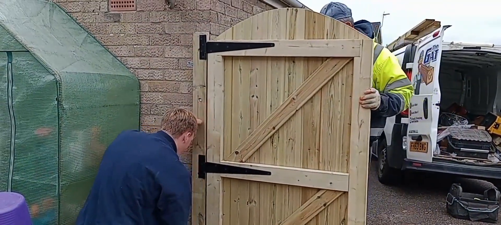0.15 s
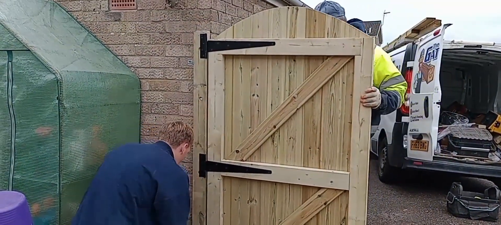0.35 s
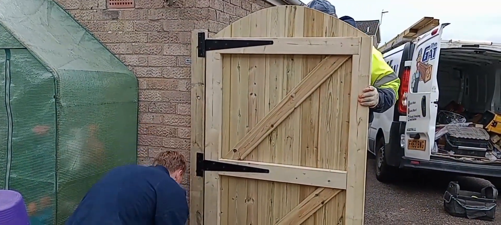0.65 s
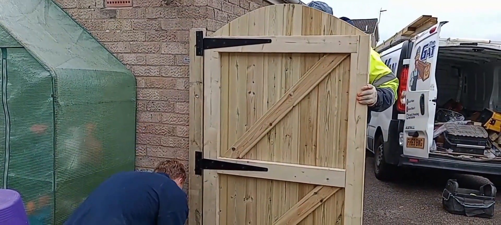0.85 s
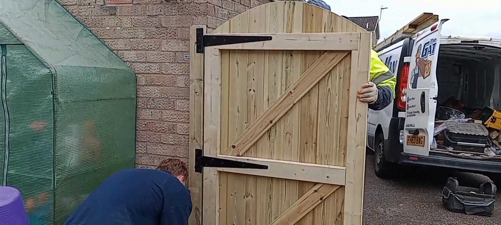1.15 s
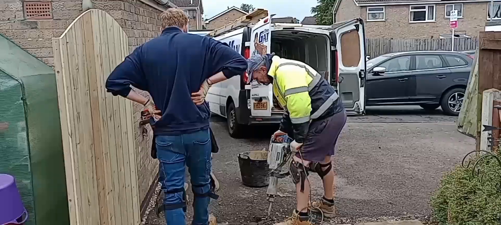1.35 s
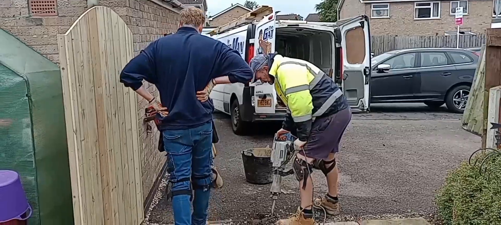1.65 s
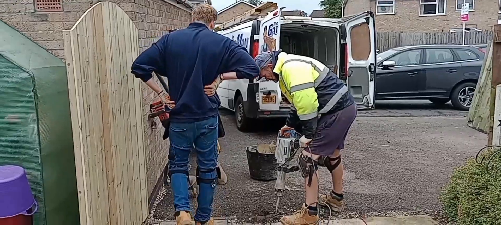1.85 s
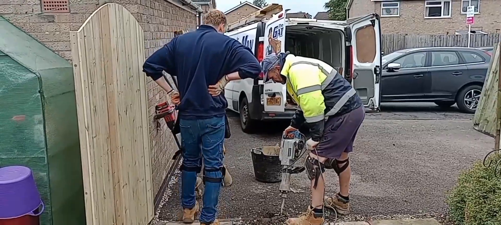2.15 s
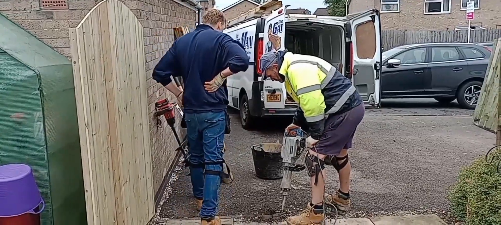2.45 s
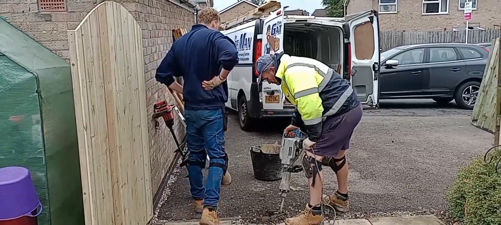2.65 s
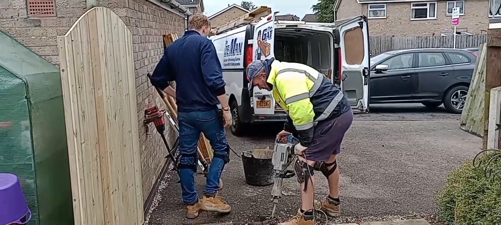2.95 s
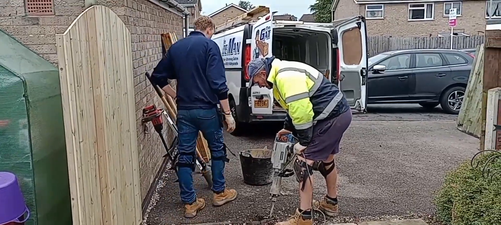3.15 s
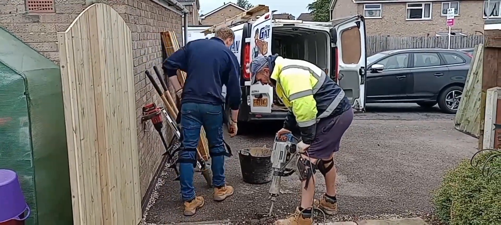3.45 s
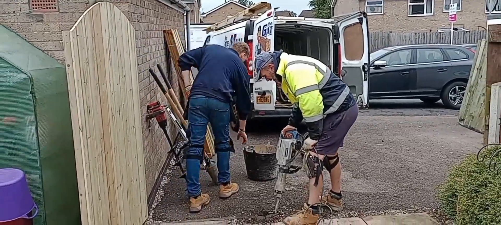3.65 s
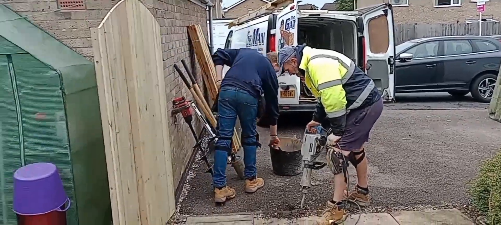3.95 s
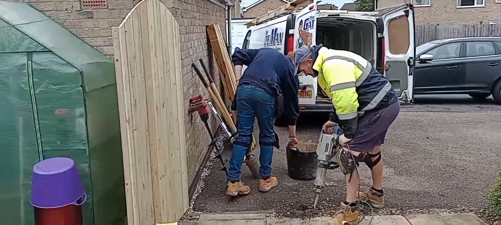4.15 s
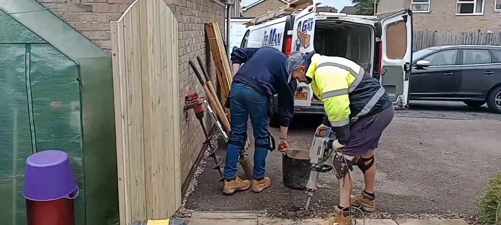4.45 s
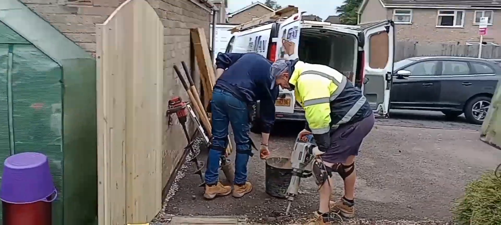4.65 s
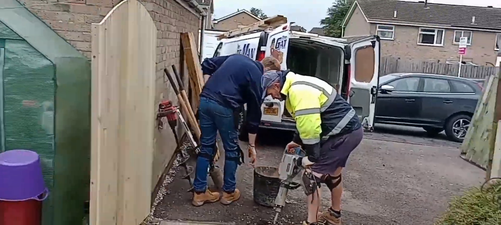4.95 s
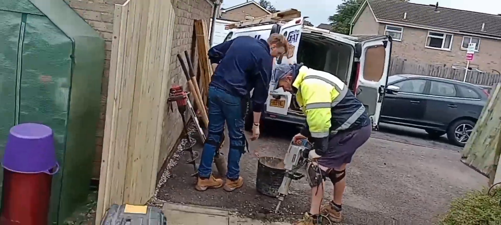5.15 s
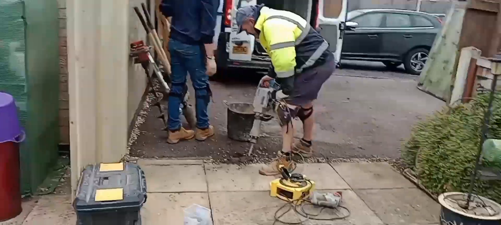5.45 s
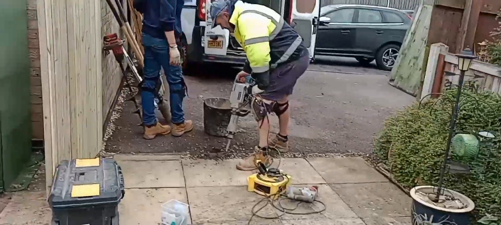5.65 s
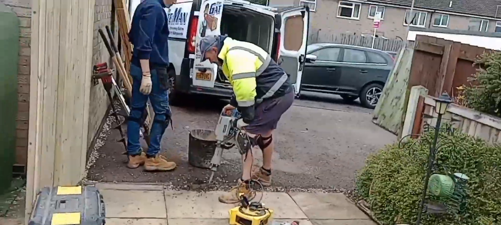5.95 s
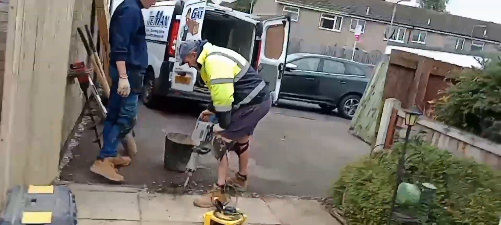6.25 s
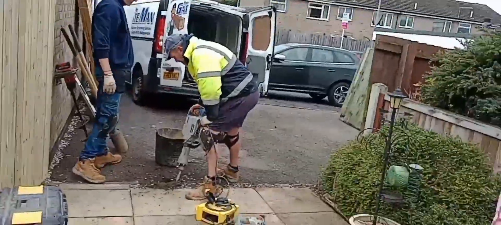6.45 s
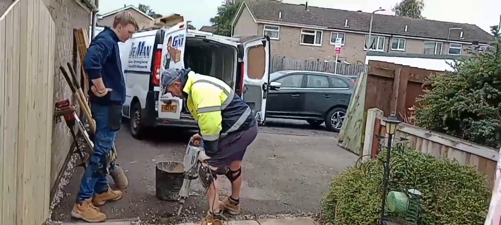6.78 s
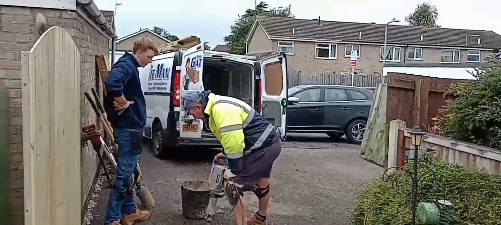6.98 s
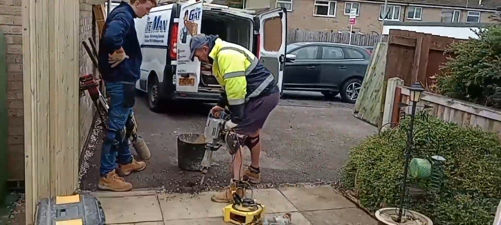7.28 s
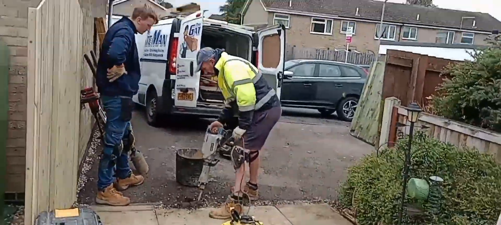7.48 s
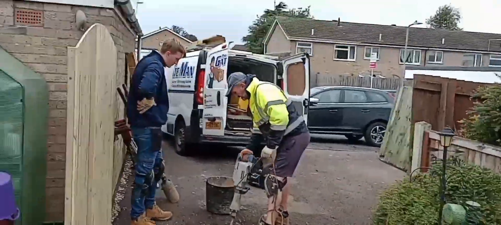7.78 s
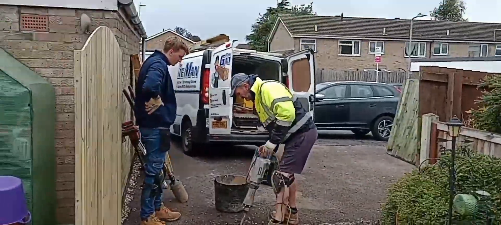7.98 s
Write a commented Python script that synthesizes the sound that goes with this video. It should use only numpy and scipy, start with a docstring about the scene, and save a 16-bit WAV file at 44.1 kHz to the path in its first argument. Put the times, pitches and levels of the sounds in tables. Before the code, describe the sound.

A wooden gate thuds against its post, then a breaker hammers stony ground at a rapid rate, ringing, scraping slab and finally rattling, amid wind buffets.

```python
"""A wooden gate knocks twice against its post: ticks, noise thuds and decaying frame modes, with wind pops.
After a short break an electric demolition hammer chisels gravelled ground, one noise burst per crank turn,
over gear clatter and air hiss. The wedged chisel zings, then rings as it bounces; a loose slab clanks.
Late on the chisel grinds along the slab, squeaks once and rattles in its holder.
Yard walls answer with a noise tail; wind buffets the microphone throughout."""
import sys
import numpy as np
from scipy import signal
from scipy.fft import rfft, irfft, next_fast_len
from scipy.io import wavfile
from scipy.ndimage import uniform_filter1d, map_coordinates

SR = 44100
rng = np.random.default_rng(int(sys.argv[2]) if len(sys.argv) > 2 else 0)


def wav_out(sig):
    """Save sig, one row per channel (or a flat mono array), as 16-bit PCM at SR to the path in sys.argv[1]."""
    wavfile.write(sys.argv[1], SR, np.round(np.clip(np.atleast_2d(sig).T, -1, 1) * 32767).astype(np.int16))


N = 358091
TIME = np.arange(N) / SR

# silent gap (start [s], end [s])
BREAK_S = (1.263, 1.302)


def amp(db):
    """Decibels to gain."""
    return 10 ** (np.asarray(db) / 20)


def unit(x):
    """Scale to rms 1."""
    return x / np.sqrt(np.mean(x ** 2) + 1e-20)


def along(points, hz):
    """Interpolate (frequency [Hz], value) points on a log frequency axis."""
    f, v = np.transpose(points)
    return np.interp(np.log(hz + 1), np.log(f + 1), v)


def curves(rows):
    """One value per sample for each column after the time."""
    s, *cols = np.transpose(rows)
    return [np.interp(TIME, s, c) for c in cols]


def wobble(knots_per_s):
    """Smooth random curve through normally distributed knots."""
    knots = rng.standard_normal(int(N * knots_per_s / SR) + 4)
    return map_coordinates(knots, [TIME * knots_per_s])


def filtered(x, response):
    """Multiply the spectrum of x by a response of frequency."""
    m = next_fast_len(N + SR // 2)
    return irfft(rfft(x, m) * response(np.fft.rfftfreq(m, 1 / SR)), m)[..., :N]


def coloured(x, spectrum):
    """Minimum-phase colouring that keeps the power of white noise."""
    size = 4096
    gain = unit(amp(along(spectrum, np.fft.rfftfreq(size, 1 / SR))))
    # folding the cepstrum onto positive time makes the filter causal
    cepstrum = irfft(np.log(gain + 1e-6))
    cepstrum[1:size // 2] *= 2
    cepstrum[size // 2 + 1:] = 0
    impulse = irfft(np.exp(rfft(cepstrum)))
    return signal.fftconvolve(x, impulse)[:N]


def noise(spectrum):
    """Coloured noise of rms 1."""
    return unit(coloured(rng.standard_normal(N), spectrum))


def add(track, s, sound):
    """Mix a sound into the track at s seconds."""
    part = track[round(s * SR):][:len(sound)]
    part += sound[:len(part)]


def ring(modes, t, scatter_db, detune):
    """Decaying modes, with new strengths and slightly new pitches at each call."""
    total = np.zeros(len(t))
    for hz, db, t60 in modes:
        decay = amp(db + rng.normal(0, scatter_db) - 60 * t / t60)
        cycles = hz * rng.normal(1, detune) * t + rng.random()
        total += decay * np.sin(2 * np.pi * cycles)
    return total


def struck(hits, modes, scatter_db, detune):
    """One ring of the modes for each (time [s], level [dB]) hit."""
    longest_s = max(t60 for _, _, t60 in modes)
    track, t = np.zeros(N), np.arange(int(SR * longest_s)) / SR
    attack = 1 - np.exp(-t / 0.00015)
    for s, db in hits:
        add(track, s, amp(db) * ring(modes, t, scatter_db, detune) * attack)
    return track


def morph(x, amount, change):
    """Blend, by amount 0-1, towards x filtered by (frequency [Hz], gain [dB]) points."""
    changed = filtered(x, lambda hz: amp(along(change, hz)))
    return x + amount * (changed - x)


# background noise colour (frequency [Hz], relative density [dB per Hz])
STREET_SPECTRUM = [(800, -8), (1840, -19), (15500, -36)]


def street():
    """Faint steady coloured noise."""
    return amp(-53.5) * noise(STREET_SPECTRUM)


# wind between buffets (time [s], level [dB])
WIND_LEVEL = [(0.45, -48.5), (0.9, -54), (1.7, -49.5), (2.15, -38), (2.9, -38.5), (3.25, -51), (5.05, -38),
              (6.0, -43), (6.46, -35.5), (7.85, -37.5)]
# rumble and thump colour (frequency [Hz], relative density [dB per Hz])
BUFFET_SPECTRUM = [(20, -64), (45, -25.5), (80, -1), (220, -5), (330, -16), (1500, -66)]
# flurries (time [s], thump [dB], flutter [dB], half length to -17 dB [s])
BUFFETS = [(1.06, -34, -52, 0.054), (2.288, -31.5, -29, 0.069), (4.454, -26, -24, 0.03),
           (4.88, -36.5, -39, 0.12), (5.306, -31, -31.5, 0.11), (6.498, -35, -32.5, 0.13),
           (7.696, -32, -31.5, 0.068), (7.86, -32, -33, 0.051)]


def wind():
    """A low rumble with flurries, each a thump with some flutter above it."""
    rumble = amp(curves(WIND_LEVEL)[0] + 3.2 * wobble(25))
    _, thump_db, flutter_db, _ = np.transpose(BUFFETS)
    swells = np.array([np.exp(-2 * ((TIME - s) / length_s) ** 2) for s, _, _, length_s in BUFFETS])
    swells = swells * amp(2.8 * wobble(70))
    low = (rumble + amp(thump_db) @ swells) * noise(BUFFET_SPECTRUM)
    flutter = noise([(100, -33.0), (230, 6.5), (520, 4), (900, -10), (2500, -52)])
    return low + amp(flutter_db) @ swells * flutter


# single eddies on the microphone (time [s], envelope peak [dB], pitch [Hz])
POPS = [(.173, -20, 89.3), (.188, -20, 140.7), (.283, -24, 135), (.3255, -17.5, 180), (.413, -29.5, 160),
        (.737, -31, 105), (.801, -28, 148), (5.269, -16, 228), (6.504, -14.5, 308), (6.515, -16, 180),
        (6.553, -11.5, 280.5), (6.6, -11.5, 151.5), (7.531, -16, 190), (7.766, -13, 210.5),
        (7.857, -21, 169.5), (7.908, -16.5, 160.5)]
POP_HALF_CYCLES = 0.44  # half length to 1/e


def pops():
    """Each eddy gives the diaphragm one low push and pull, with two weaker ones nearby."""
    track = np.zeros(N)
    for first_s, first_db, hz in POPS:
        for k in range(3):
            s = first_s + k * rng.normal(0, 0.01355)
            swell = amp(first_db - 6 * k) * np.exp(-((TIME - s) * hz / POP_HALF_CYCLES) ** 2)
            track += swell * np.sin(2 * np.pi * (hz * TIME + rng.random()))
    return track


# decay of the yard (frequency [Hz], t60 [s])
YARD_T60 = [(200, 0.56), (2000, 0.03), (12000, 0.54)]


def yard(x):
    """Walls and paving scatter a diffuse tail, 5 ms late, with its own decay at each frequency."""
    hz, t, z = signal.stft(rng.standard_normal(SR // 3), SR, nperseg=256)
    decay = amp(-60 * t / along(YARD_T60, hz)[:, None])
    tail = signal.istft(z * decay, SR, nperseg=256)[1]
    delayed = np.pad(x, (round(.005 * SR), 0))
    return signal.fftconvolve(delayed, tail / np.linalg.norm(tail))[:N]


# gate meets post (time [s], level [dB], contact tick [dB])
KNOCKS = [(.101, -28, -30.5), (0.105, -19, -46), (.111, -22, -48), (0.153, -34, -43), (0.9896, -19, -28.5),
          (1.0, -22, -42), (1.03, -26.5, -54)]
# gate frame (frequency [Hz], relative level [dB], t60 [s])
GATE_MODES = [(132.6, -9.5, 0.3), (303, -9, 0.16), (415, -12, 0.16), (547, -5, 0.096), (670, -6.5, 0.1),
              (835, -15, 0.17), (1280, -14, 0.078), (1570, -30, 0.15)]


def gate():
    """Each contact ticks, thuds through the boards and rings the frame."""
    ticks, thuds, t = np.zeros(N), np.zeros(N), np.arange(SR // 3) / SR
    # a fast decay, then a weaker slow one
    tick_decay = amp(-60 * t / 0.032) + amp(-9.0 - 60 * t / 0.31)
    thud_decay = amp(-60 * t / 0.07) + amp(-19.5 - 60 * t / 0.37)
    for s, db, tick_db in KNOCKS:
        add(ticks, s, amp(tick_db) * tick_decay * rng.standard_normal(len(t)))
        add(thuds, s, amp(db) * thud_decay * rng.standard_normal(len(t)))
    frame = struck([row[:2] for row in KNOCKS], GATE_MODES, scatter_db=3, detune=0.012)
    boards = coloured(thuds, [(60, -9.5), (650, 0.0), (1000, -14), (1600, -19.0), (2500, -45)])
    contact = coloured(ticks, [(1500, 8.5), (2400, -3), (5300, -1.5), (6300, -3), (15000, -16)])
    knocks = frame + boards + contact
    return knocks + amp(-14) * yard(knocks)


# crank speed, slower under load (time [s], rate [blows per s])
CRANK_RATE = [(1.32, 30.68), (2.175, 28.0), (2.36, 30.1), (3.155, 25.12), (3.589, 25.59), (3.763, 21.69),
              (4.076, 27.13), (4.303, 21.04), (4.392, 27.77), (4.831, 22.35), (5.298, 27.26),
              (5.423, 23.24), (5.902, 22.63), (6.571, 26.47), (6.931, 22.39), (7.748, 23.56),
              (7.828, 28.59), (8.12, 24.71)]
START_TURN = -0.04


def crank():
    """Crank position [turns]: the integral of the rate, at rest before the first row."""
    running = TIME >= CRANK_RATE[0][0]
    return START_TURN + np.cumsum(curves(CRANK_RATE)[0] * running) / SR


def strokes(turns):
    """The moments [s] at which the crank completes a turn."""
    return TIME[1:][np.diff(np.floor(turns)) > 0]


def bouts(rows, turns, fade_db_per_s):
    """One (time [s], level [dB]) hit for every stroke between the start and end of each row."""
    times = strokes(turns)
    hits = []
    for start, end, db in rows:
        hits += [(s, db - fade_db_per_s * (s - start)) for s in times if start <= s < end]
    return hits


# looseness of the chisel in its hole: tighter, strokes more alike (time [s], looseness [1])
LOOSENESS = [(2.0, 0.48), (3.3, 2.3), (5.25, 1.46), (5.5, 0.79), (6.35, 0.58), (6.7, 1.6)]
# change of the stroke pattern (frequency [Hz], renewal per stroke at looseness 1 [1])
RENEWAL = [(500, .25), (3500, .6), (9000, 1.1)]


def patterns(times, size):
    """One noise burst per stroke, each a slightly changed copy of the last; the bass repeats best."""
    renewal = along(RENEWAL, np.fft.rfftfreq(size, 1 / SR))
    bursts = rfft(rng.standard_normal((len(times), size)))
    looseness = np.interp(times[1:], *np.transpose(LOOSENESS))
    for k, loose in enumerate(looseness, 1):
        kept = np.exp(-renewal * loose)
        # root of 1 - kept^2 holds the power constant
        bursts[k] = kept * bursts[k - 1] + np.sqrt(1 - kept ** 2) * bursts[k]
    return irfft(bursts, size)


# gear colour (frequency [Hz], relative density [dB per Hz])
GEAR_SPECTRUM = [(70, -34), (200, 1.5), (290, -6.5), (380, -5), (520, -7.5), (1100, -7), (1600, 2),
                 (2000, -1.5), (2900, 2), (3700, 2.5), (4600, 1), (5600, -1.5), (7000, -5), (10000, -13)]


def clatter(turns):
    """The gear train repeats part of its clatter on every crank turn; the rest is chance."""
    times, track = strokes(turns), np.zeros(N)
    lengths_s = np.diff(times, append=N / SR)
    for s, length_s, burst in zip(times, lengths_s, patterns(times, size=SR // 12)):
        add(track, s, burst[:round(length_s * SR)])
    return unit(coloured(track + 0.69 * rng.standard_normal(N), GEAR_SPECTRUM))


def patchy(x, depth_db):
    """Loose parts ring at their own pitches for a few hundredths of a second."""
    z = signal.stft(x, nperseg=512)[2]
    field = uniform_filter1d(rng.standard_normal(z.shape), size=4, axis=0)
    field = uniform_filter1d(field, size=6, axis=1)
    gain = unit(amp(depth_db * unit(field)))
    return signal.istft(z * gain, nperseg=512)[1][:N]


# motor (time [s], gear rattle [dB], air hiss [dB])
MOTOR_LEVELS = [(1.32, -37, -46), (1.5, -31, -37.5), (2.2, -27.5, -37), (2.7, -29, -40.5),
                (4.05, -29, -32.5), (4.4, -29.5, -36.5), (7.7, -29, -34), (7.92, -29, -48)]
# cooling air colour (frequency [Hz], relative density [dB per Hz])
AIR_SPECTRUM = [(2500, -30), (5000, -9), (7000, -1), (8300, 2), (9400, -3), (11700, -3), (12700, -1),
                (15600, -9)]


def motor(turns):
    """Gears rattle, hardest as the piston compresses before a blow; cooling air hisses."""
    gear_db, air_db = curves(MOTOR_LEVELS)
    load = np.cos(2 * np.pi * (turns + 0.23))
    gears = amp(gear_db + 1.9 * load + 0.84 * wobble(260)) * clatter(turns)
    air = amp(air_db + 3.9 * wobble(170)) * noise(AIR_SPECTRUM)
    return patchy(gears + air, depth_db=2)


# shank squeal (time [s], level [dB])
SQUEAL_LEVEL = [(1.4, -43), (2.7, -34.5), (6.5, -34), (6.8, -51), (7.72, -46), (7.82, -31), (7.92, -58)]
SQUEAL_HZ, SQUEAL_Q = 12480, 55


def squeal():
    """The shank sticks and slips in its holder and excites one high resonance in fitful chirps."""
    slips = amp(5 * wobble(60)) * rng.standard_normal(N)
    resonance = signal.iirpeak(SQUEAL_HZ, SQUEAL_Q, SR)
    return amp(curves(SQUEAL_LEVEL)[0]) * unit(signal.lfilter(*resonance, slips))


RATTLE_START_S, RATTLE_TICKS_PER_S, RATTLE_DB = 7.86, 69, -20
# tick colour (frequency [Hz], relative density [dB per Hz])
RATTLE_SPECTRUM = [(1200, -19), (2000, -3.5), (3560, 0.5), (4500, -9), (5260, -2), (6000, -8.5),
                   (10300, -9), (12500, -27)]


def rattle():
    """Uneven steel ticks in the holder once the chisel no longer presses on the ground."""
    track, t = np.zeros(N), np.arange(SR // 20) / SR
    for s in np.arange(RATTLE_START_S, N / SR, 1 / RATTLE_TICKS_PER_S):
        tick_s = s + rng.normal(0, 0.0027)
        decay = amp(RATTLE_DB + rng.normal(0, 0.98) - 60 * t / 0.066)
        add(track, tick_s, decay * rng.standard_normal(len(t)))
    return coloured(track, RATTLE_SPECTRUM)


SQUEAK_S, SQUEAK_HZ, SQUEAK_DB, SQUEAK_HALF_LENGTH_S = 7.82, 3060, -23, 0.02


def squeak():
    """The chisel slips off the slab with one short squeak, rough from phase wobble."""
    swell = amp(SQUEAK_DB) * np.exp(-((TIME - SQUEAK_S) / SQUEAK_HALF_LENGTH_S) ** 2)
    return swell * np.sin(2 * np.pi * (SQUEAK_HZ * TIME + 0.17 * wobble(250)))


# chisel grinds along the slab (start [s], end [s], level [dB])
GRINDS = [(6.815, 7.247, -37), (7.38, 7.782, -35)]
# held slab ring colour (frequency [Hz], relative density [dB per Hz])
GRIND_SPECTRUM = [(1000, -15), (1310, 1.5), (1450, -1), (2600, -50)]


def grinding(turns):
    """A rough, held ring of the slab that swells with every stroke."""
    steps = sum(amp(db) * ((TIME > start) & (TIME < end)) for start, end, db in GRINDS)
    pressure = uniform_filter1d(steps, size=400)
    swell_db = 3.4 * np.cos(2 * np.pi * (turns - .2)) + 2.0 * wobble(14)
    return pressure * amp(swell_db) * noise(GRIND_SPECTRUM)


# slab clanks at every stroke (start [s], end [s], first level before trim [dB])
CLANKS = [(3.64, 3.68, -24), (4.13, 4.17, -16.5), (6.8, 7.3, -19), (7.37, 7.53, -25)]
# loosened slab (frequency [Hz], relative level [dB], t60 [s])
SLAB_MODES = [(690, -7, .07), (1030, -9, .08), (1240, -3, .11), (1345, 0, .13), (2200, -10, .08)]
SETTLE_DB_PER_S, SLAB_TRIM_DB = 18, -5.0


def slab(turns):
    """A loosened slab of ground clanks at every stroke, less as it settles."""
    clanks = struck(bouts(CLANKS, turns, SETTLE_DB_PER_S), SLAB_MODES, scatter_db=4.0, detune=0.033)
    return clanks * amp(SLAB_TRIM_DB + 1.4 * wobble(260))


# wedged chisel zings (start [s], end [s], first level [dB])
ZINGS = [(2.6, 3.2, -30), (5.85, 6.55, -29)]
# zing (frequency [Hz], relative level [dB], t60 [s])
ZING_MODES = [(8240, 5.5, 0.099)]


def zing(turns):
    """The wedged chisel zings at one high mode after each blow."""
    return struck(bouts(ZINGS, turns, fade_db_per_s=1), ZING_MODES, scatter_db=1.5, detune=0.0061)


# chisel bounces free (start [s], end [s], first level [dB])
RINGS = [(3.16, 3.225, -25.5), (3.56, 3.63, -25), (3.86, 3.97, -27), (4.17, 4.3, -28), (4.61, 4.67, -25.5),
         (4.87, 4.933, -25)]
# lengthwise chisel (frequency [Hz], relative level [dB], t60 [s])
CHISEL_MODES = [(7365, 2.5, 0.1), (7440, 2.5, 0.19), (7620, 5, 0.19), (10600, -4, 0.2), (12400, -6, 0.22)]


def chisel(turns):
    """The chisel bounces free and rings lengthwise at every stroke."""
    rings = struck(bouts(RINGS, turns, fade_db_per_s=8), CHISEL_MODES, scatter_db=5.0, detune=0.0033)
    return rings * amp(2.6 * wobble(110))


# blow: strong on stone, weak in loose ground (time [s], level [dB])
BLOW_LEVEL = [(1.33, -32), (1.56, -21), (2.0, -18.5), (2.28, -22), (2.62, -17.5), (4.55, -15.5),
              (6.2, -15.5), (7.05, -18.5), (7.72, -18), (7.88, -29.5)]
# chisel slips from its seat or lands squarely on stone (time [s], level change [dB])
ODD_BLOWS = [(3.023, 1), (3.26, -7), (4.15, -3), (4.28, 0.5), (4.385, -4.5), (4.715, -8), (4.755, 3),
             (4.97, -5), (7.47, 2.5)]
ODD_HALF_LENGTH_S = .02


def force():
    """Blow level [dB]: set by the ground, with single blows that slip or land hard."""
    odd_db = sum(db * np.exp(-((TIME - s) / ODD_HALF_LENGTH_S) ** 2) for s, db in ODD_BLOWS)
    return curves(BLOW_LEVEL)[0] + odd_db


# tip ping, clearest in the first blows, fading later (time [s], level over the blow [dB])
TIP_LEVEL = [(1.6, 3), (2.2, -1.5), (5.7, -10)]
# chisel tip (frequency [Hz], relative level [dB], t60 [s])
TIP_MODES = [(3780, 2.5, 0.008), (5740, 2.5, 0.0096)]


def pings(turns):
    """The tip, held by the ground, gives a very short ping at each stroke."""
    times = strokes(turns)
    levels_db = np.interp(times, TIME, force() + curves(TIP_LEVEL)[0])
    return struck(zip(times, levels_db), TIP_MODES, scatter_db=2, detune=0.024)


FRAGMENT_DB, FRAGMENT_HZ = 2.6, 1300  # depth and spacing of random gain knots


def fragments(bursts):
    """Every blow breaks other stone: each burst gets its own broad peaks and dips."""
    size = bursts.shape[1]
    hz = np.fft.rfftfreq(size, 1 / SR)
    knots = rng.standard_normal((len(bursts), int(hz[-1] / FRAGMENT_HZ) + 2))
    gains = [unit(amp(FRAGMENT_DB * map_coordinates(row, [hz / FRAGMENT_HZ]))) for row in knots]
    return irfft(rfft(bursts) * gains, size)


# ground reflections: two short repeats after each blow (delay [s], level [dB])
REFLECTIONS = [(.0022, -3), (.0066, -3)]
# cracking stone colour (frequency [Hz], relative density [dB per Hz])
CRACK_SPECTRUM = [(60, -16.5), (520, -3.5), (1100, -8.5), (1600, -3.5), (3000, -3.5), (3800, 4),
                  (4900, 1.5), (6600, 0.5), (7900, 3.5), (9500, -5.5), (11500, -5), (12800, -1),
                  (15500, -7.5)]


def blows(turns):
    """Once a crank turn the striker hits: stone snaps and crumbles, the ground reflects, grit trickles."""
    times, track, t = strokes(turns), np.zeros(N), np.arange(SR // 12) / SR
    snap = amp(6.5 - 60 * t / 0.0014)
    crumble = amp(1.5 - 60 * t / 0.03)
    trickle = amp(-19 - 60 * t / 0.29)
    levels_db = np.interp(times, TIME, force()) + 1.0 * rng.standard_normal(len(times))
    bursts = fragments(patterns(times, size=len(t)))
    for s, db, burst in zip(times, levels_db, bursts):
        reflected = np.zeros(len(t))
        for delay_s, level_db in REFLECTIONS:
            arrived = t > delay_s * rng.uniform(.85, 1.15)
            reflected += amp(level_db - 60 * np.abs(t - delay_s) / 0.019) * arrived
        add(track, s, amp(db) * np.hypot(snap + crumble + trickle, reflected) * burst)
    return coloured(track, CRACK_SPECTRUM)


# tool pose (time [s], lean [0-1], dullness of tone [0-1])
POSE = [(2.35, 1, 0.84), (2.7, 0.67, 0.44), (6.68, 0.37, 0.3), (6.82, 1, 0), (7.75, 0.6, 0.04),
        (7.92, 0.93, 0.9)]
# tone at full lean (frequency [Hz], gain [dB])
LEANED_TONE = [(400, 4), (750, 7.5), (1650, 4), (2800, 5), (4500, -1), (5700, -1.5), (7800, 1), (9200, 6),
               (12600, 2.5)]
# tone at full dullness (frequency [Hz], gain [dB])
DULLED_TONE = [(700, 0), (1400, -2), (2800, -2.5), (3800, 1.5), (4500, 0), (5600, 4.5), (8200, -2),
               (10000, -4), (13300, 1), (14000, -9)]


def hammer():
    """Blows, yard echo and motor toned by the pose, plus the steel and slab; silent until the break ends."""
    turns = crank()
    lean, dullness = curves(POSE)
    cracks = blows(turns) + pings(turns)
    tool = cracks + amp(-6.5) * yard(cracks) + motor(turns)
    tool = morph(tool, lean, LEANED_TONE)
    tool = morph(tool, dullness, DULLED_TONE)
    steel = chisel(turns) + zing(turns) + squeal() + squeak() + rattle()
    ground = slab(turns) + grinding(turns)
    return (tool + steel + ground) * (TIME > BREAK_S[1])


# side of the treble: slightly wide until 2.9 s, then almost mono (time [s], level [dB])
SIDE_LEVEL = [(2.9, -22.5), (3.15, -62)]


def scene():
    """Gate first, then the hammer, over wind and street; the treble is slightly wide, then almost mono."""
    hammering = hammer()
    mid = street() + wind() + pops() + gate() + hammering
    side = amp(curves(SIDE_LEVEL)[0]) * filtered(yard(hammering), lambda hz: hz > 4000)
    return np.array([mid + side, mid - side])


CLIP_TOP, TOP_HZ, FADE_IN_S = 0.53, 15650, 0.031


def record(dry):
    """Peaks are rounded, the break is silent with a fade-in after it, and the band ends at TOP_HZ."""
    rounded = dry / (1 + (dry / CLIP_TOP) ** 4) ** (1 / 4)
    running = (TIME < BREAK_S[0]) + np.clip((TIME - BREAK_S[1]) / FADE_IN_S, 0, 1)
    return filtered(rounded * running, lambda hz: 1 / np.sqrt(1 + (hz / TOP_HZ) ** 300))


dry = scene()
out = record(dry)
wav_out(out)
```